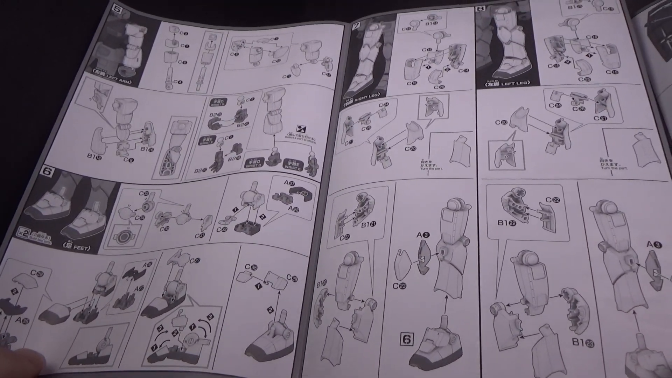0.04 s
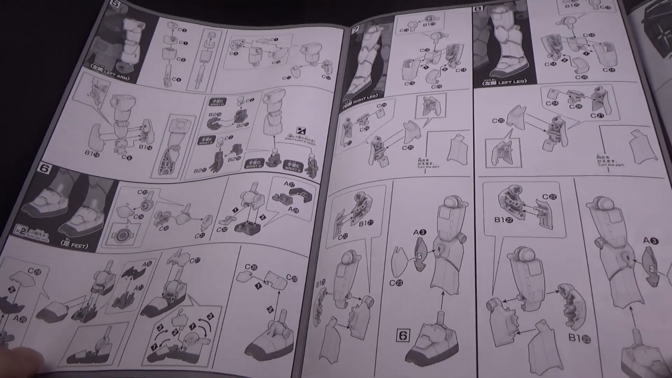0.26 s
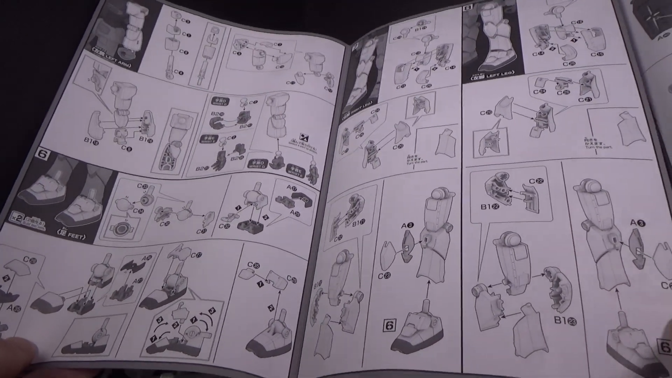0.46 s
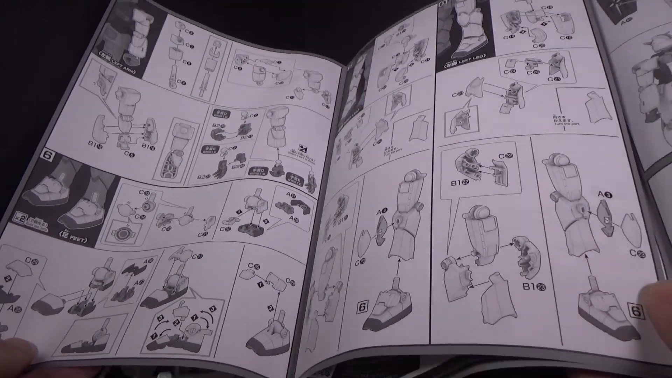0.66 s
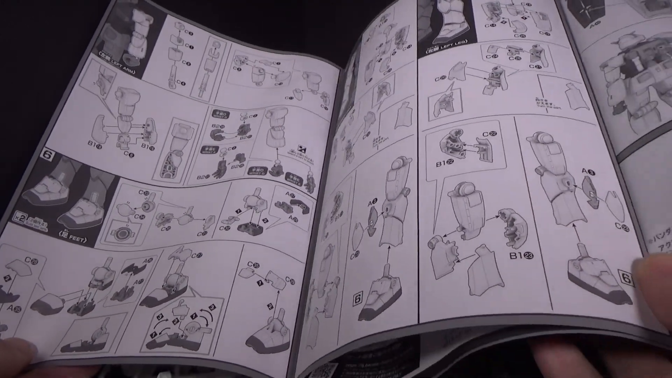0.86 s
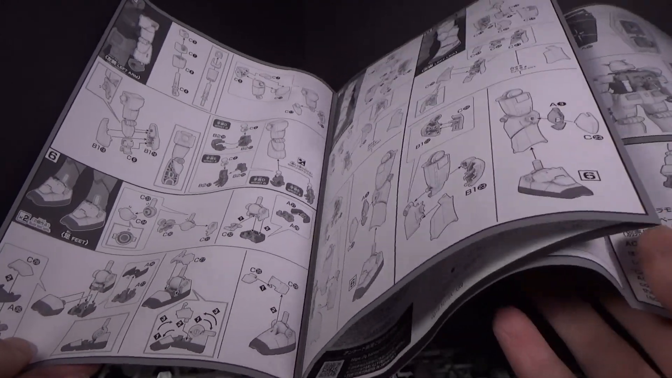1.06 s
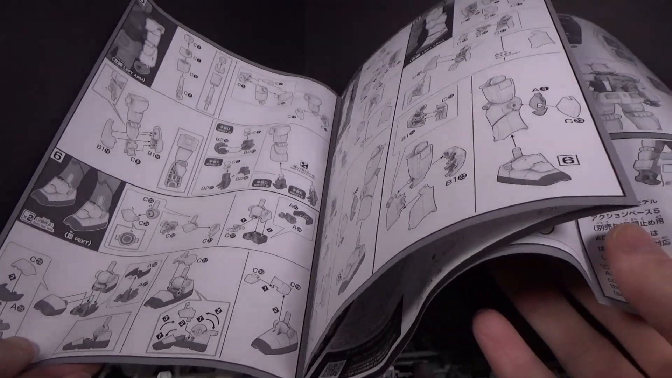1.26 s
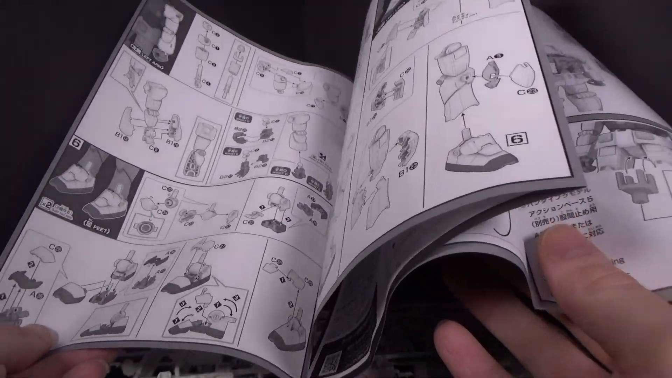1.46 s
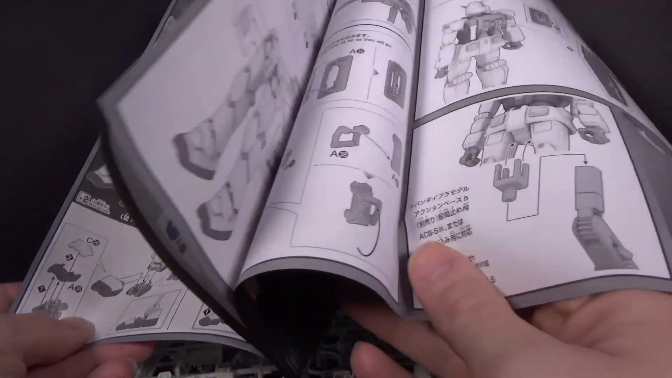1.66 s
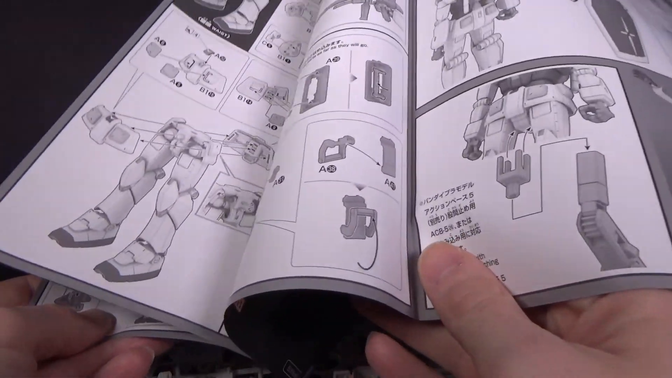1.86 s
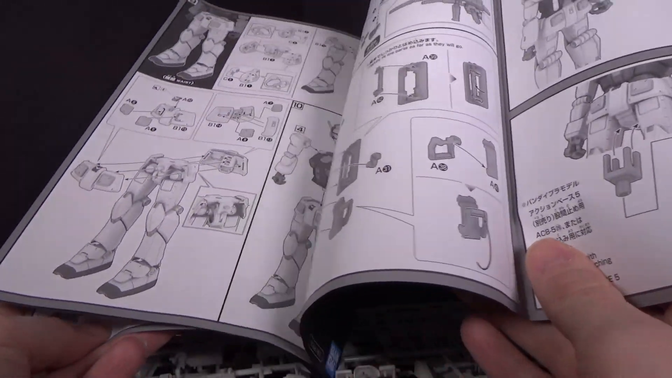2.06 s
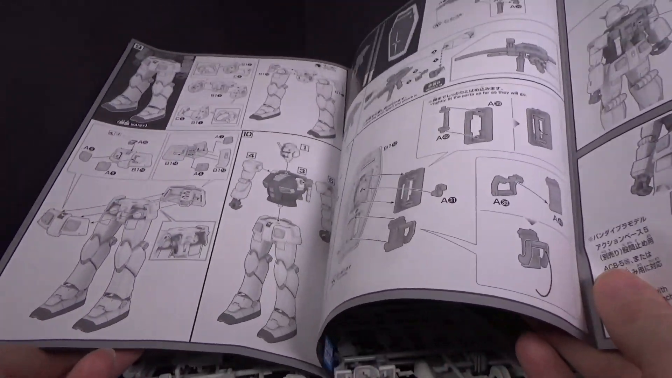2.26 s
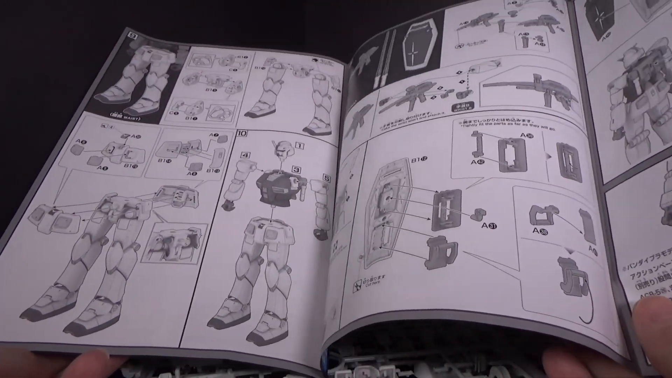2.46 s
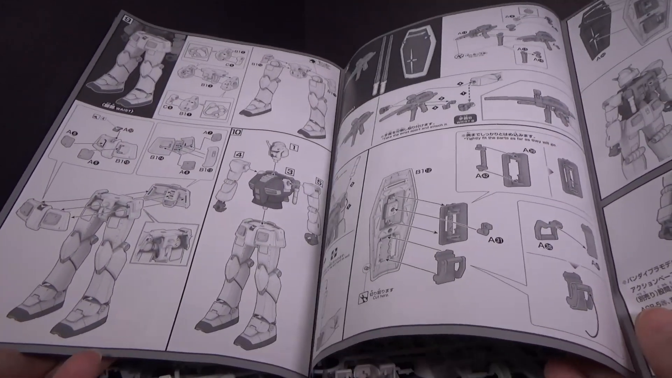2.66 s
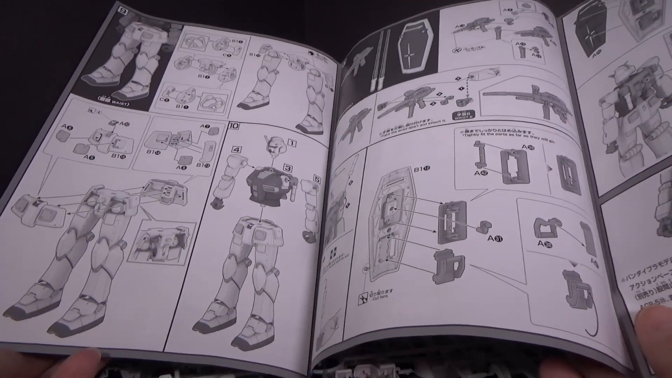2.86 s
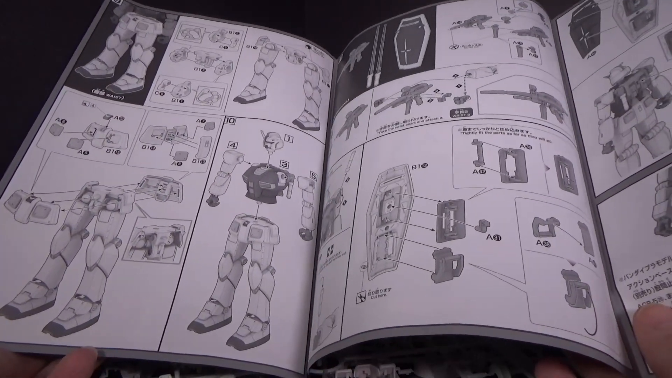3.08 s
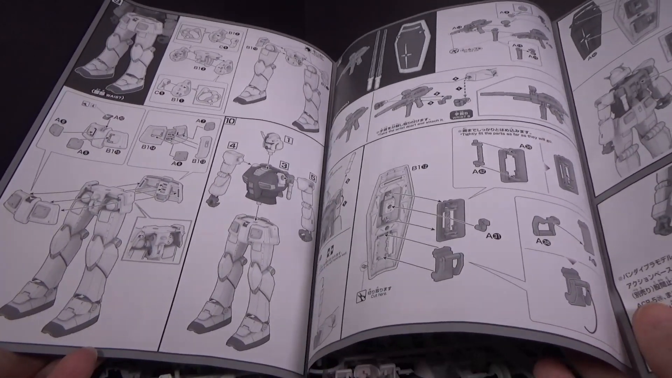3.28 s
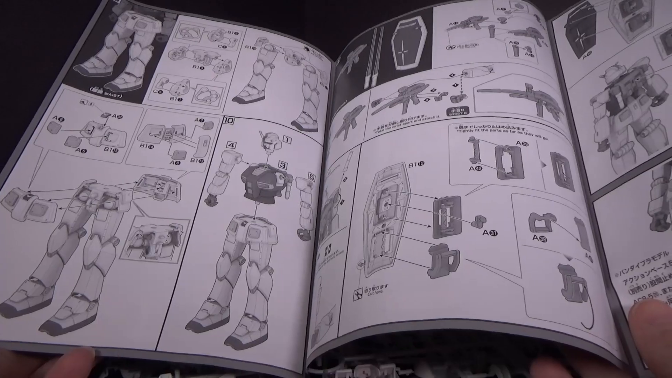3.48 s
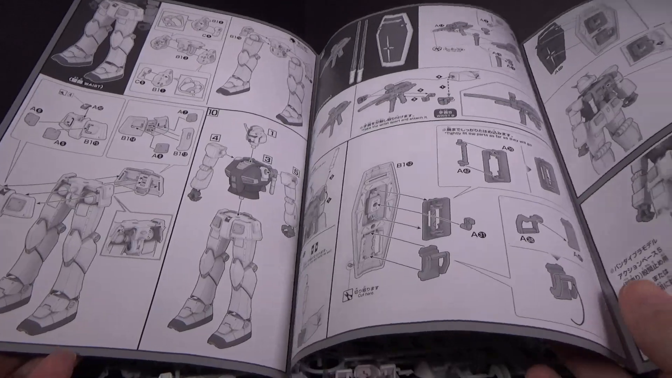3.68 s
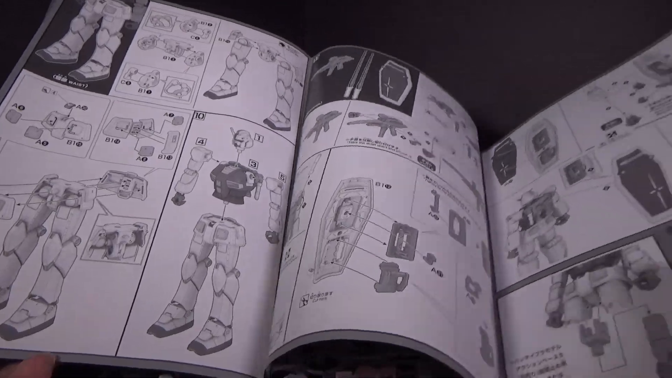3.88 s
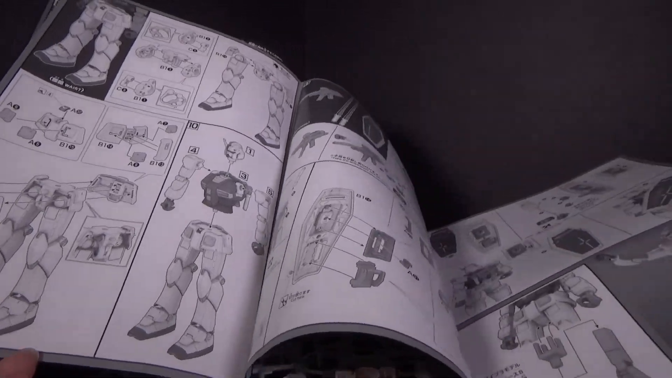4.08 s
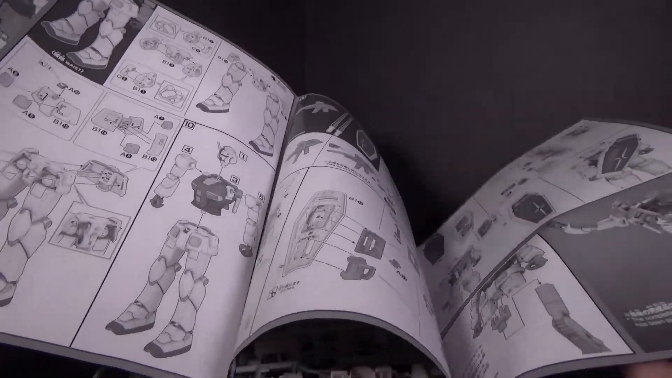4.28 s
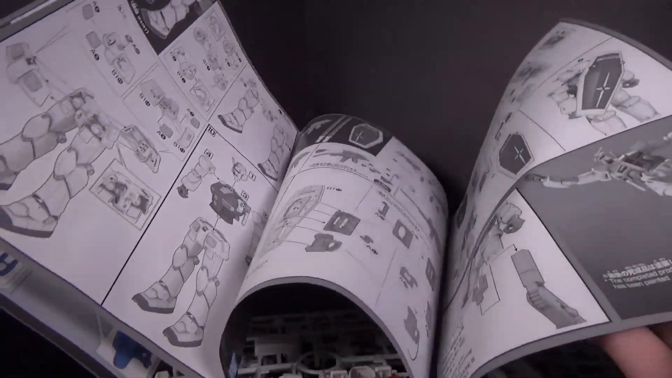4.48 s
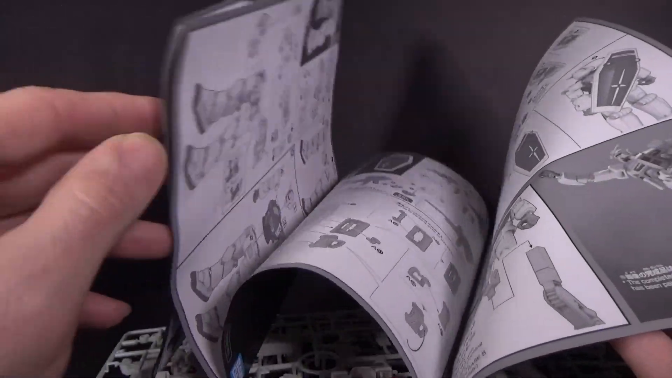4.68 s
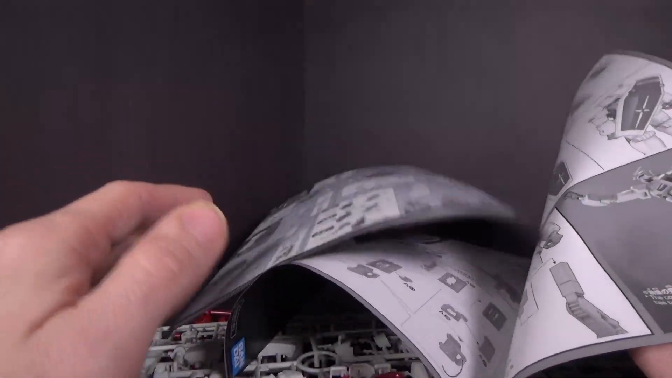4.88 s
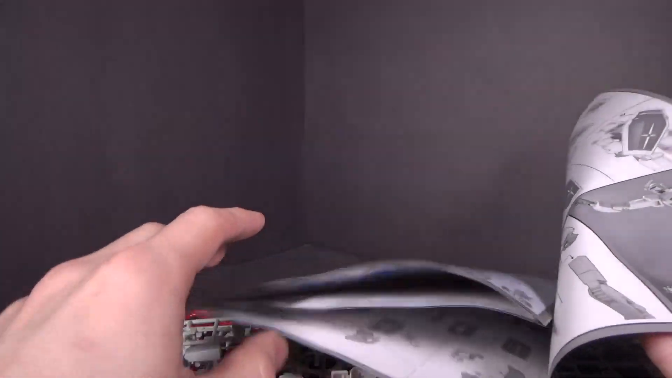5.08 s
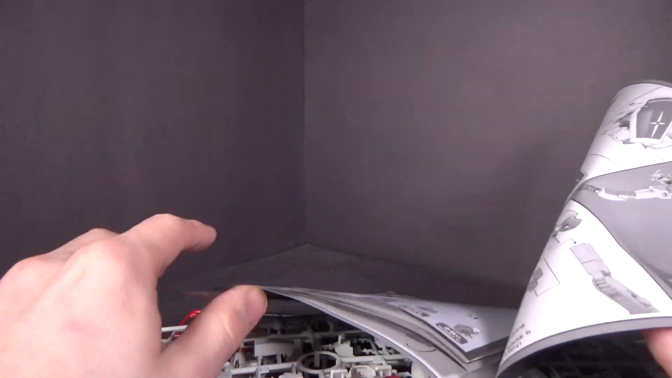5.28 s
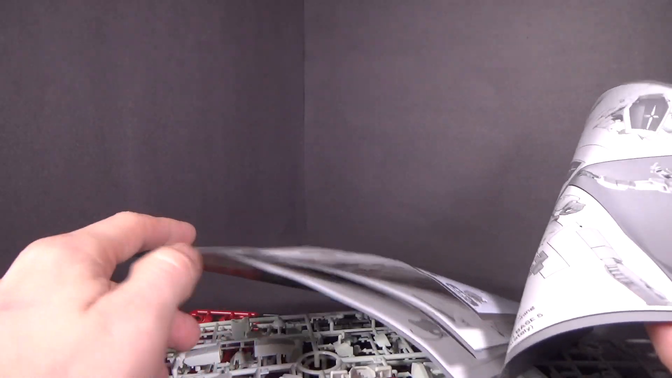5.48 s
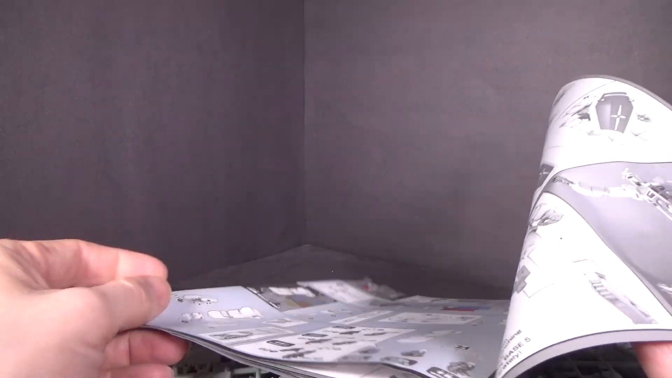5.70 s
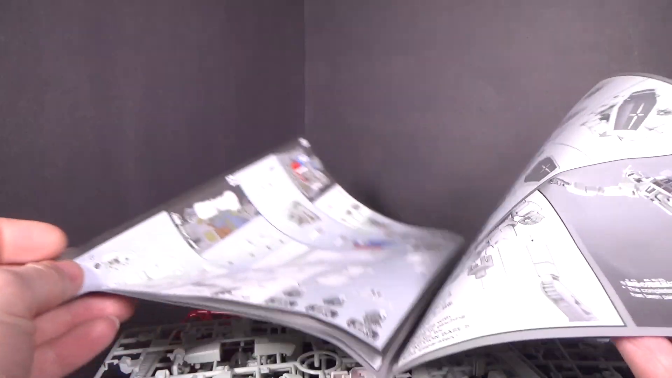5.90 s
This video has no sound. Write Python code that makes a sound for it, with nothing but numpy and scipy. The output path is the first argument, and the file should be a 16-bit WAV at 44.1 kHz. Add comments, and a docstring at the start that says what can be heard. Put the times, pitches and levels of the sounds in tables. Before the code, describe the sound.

Close, dry handling of a stiff glossy booklet in a small quiet room with faint steady background noise. From 0 to 1.4 s there are small scattered creases, short papery ticks, between very soft slides. At 1.5 s a bright loud snap starts a page turn, followed by lesser crackles and a hissing slide near 1.65 s; another hard snap comes at 2.1 s, with rustle and smaller creases until 2.5 s. Then only faint sliding remains until about 3.6 s, when a crisp crease opens a denser passage. Strong snaps at 3.9, 4.1 and 4.4 s mix with rustling strokes and low airy bumps, loudest around 4.0 s. Flaps and crackles cluster at 5.0-5.2 s, a sharp snap lands at 5.5 s, then lighter rustle eases out. Snaps are millisecond bursts, mid-pitched and woody-papery with sizzling tops, mostly doubled about 14 ms later by a close reflection, with a brief dull decay.

```python
"""Pages of a stiff glossy booklet are lifted, bent and turned close to a microphone in a small quiet room.
At first scattered creases snap between soft slides, with two loud snaps near 1.5 and 2.1 s.
From about 2.5 s only faint slides are left; at 3.6 s stronger, denser snaps and strokes set in, easing at the end.
Creases are short ticking bursts through resonances, slides are grainy noise, and moving air adds low bumps.
Most snaps and all page and room noise are heard twice, usually about 14 ms apart."""
import sys
import numpy as np
from scipy import signal
from scipy.fft import rfft, irfft, next_fast_len
from scipy.io import wavfile
from scipy.ndimage import uniform_filter1d

SR = 44100
rng = np.random.default_rng(int(sys.argv[2]) if len(sys.argv) > 2 else 0)


def unload_audio(sound):
    """Save the sound as a 16-bit wav file, at the path given as the first command line argument."""
    columns = np.transpose(np.atleast_2d(sound))
    # keep every value between -1 and 1, then stretch to whole-number steps
    steps = np.round(np.clip(columns, -1, 1) * 32767)
    wavfile.write(sys.argv[1], SR, steps.astype(np.int16))


N = 262086

CUTOFF_HZ = 16000
REPEAT_MS, REPEAT_DB = (13.4, 14.3), -1.5   # range of lags for the page and room noise; gain of every repeat


def snaps():
    """A crease gives way in a few ms of uneven ticks; the sheet rings at its pitch, the air behind it thumps."""
    # buckling creases: [t/s, crack level before the length scaling/dB, sheet pitch/Hz,
    # sizzle over crack/dB, repeat lag/ms (3 or less: none; held to 16)]
    creases = [(0.0471, -50.5, 1190, -12, 16.5), (0.1967, -47, 3500, -10, 16),
               (0.388, -37.5, 2770, -0.5, 16), (0.5443, -52, 1500, -12, 14.5), (0.6002, -38, 1500, -16, 15),
               (0.8332, -50, 1700, -11, 12.5), (0.9594, -45, 1100, 1, 14.5),
               (1.0296, -38, 2120, -0.5, 16.5), (1.363, -50.5, 1840, -11, 0), (1.4197, -52.5, 1010, -8, 12),
               (1.5107, -25, 3180, 1.5, 14.5), (1.544, -39, 1530, -4, 16), (1.574, -35.5, 1930, -19, 14.5),
               (1.6287, -31, 1840, 4, 14), (1.7469, -35.5, 1250, -10, 8.5), (1.8626, -54, 1130, -10, 13.5),
               (1.9185, -61, 2500, 19, -4), (1.959, -42.5, 1840, -11, 8.5), (2.0456, -35, 2170, -0.5, 14.5),
               (2.0871, -23.5, 1490, -3.5, 14.5), (2.1657, -41.5, 1030, -17, 14.5),
               (2.2204, -30.5, 1270, -4, 16), (2.312, -44.5, 1300, -1.5, 2.5), (2.4542, -33, 2030, -11, 0),
               (2.4798, -33.5, 1350, -12, 14), (2.4875, -35.5, 1044, -20, 13.5),
               (3.6, -29.5, 1300, -15, 14.5), (3.773, -36.5, 1670, -33, 14), (3.813, -32, 980, -36, 15.5),
               (3.916, -25, 1550, -9.5, 15.5), (4.0052, -37, 1230, -26, 7), (4.0918, -24.5, 1125, -15, 15),
               (4.2114, -30, 1850, -5.5, 16), (4.3102, -33, 3000, -3, 16.5),
               (4.3827, -25.5, 2220, -13, 13.5), (4.42, -39, 990, 1.5, 14), (4.4542, -37.5, 1500, -11, 9),
               (4.539, -38.5, 1540, -7, 14), (4.641, -32, 2260, -5.5, 0), (4.6544, -26.5, 1830, -7, 17.5),
               (4.7775, -48, 1700, -16, 12), (4.8562, -30.5, 1810, -49, 14.5),
               (4.9573, -37.5, 1440, -6, 14), (5.031, -34.5, 2470, -1, 12), (5.0364, -22.5, 1920, -5, 14.5),
               (5.077, -34.5, 1700, -3.5, 12.5), (5.126, -30.5, 1580, -20, 16),
               (5.149, -26, 1760, -23, 16.5), (5.5048, -21.5, 1870, -4, 15.5),
               (5.598, -38.5, 1650, -18, 16.5), (5.759, -33, 1960, -13, 12.5)]
    # bright top of a snap, relative density: [f/Hz, level/dB per Hz]
    sizzle_spectrum = [(3000, -31), (5000, 9.5), (8000, 5), (11000, -2), (13500, -12.5), (16000, -9)]
    creak_ms = 4   # the fold creaks this long before it gives way
    base_ms, longer_ms_per_db = 5.6, .08   # fading time at -30 dB; louder creases tear longer
    peaks_db, peak_spacing_hz = 2.5, 260   # each crease has an uneven spectrum of its own
    thump_even_hz, thump_db_per_octave, thump_least_db = 1110, -17, -37   # slack, low-pitched sheets thump most

    size, out = 3072, np.zeros(N + 5000)
    ms = np.arange(size) / SR * 1000
    ticks = grains((len(creases), size), 2.2)
    lumps = rng.standard_normal((len(creases), size // 32))
    peaks_hz = np.arange(200, CUTOFF_HZ, peak_spacing_hz)
    colours = peaks_db * rng.standard_normal((len(creases), len(peaks_hz)))
    for (s, crack_db, hz, sizzle_db, repeat_ms), tick, lump, colour in zip(creases, ticks, lumps, colours):
        length_ms = np.clip(base_ms + longer_ms_per_db * (crack_db + 30), 2, 8)
        length_ms = length_ms * np.clip(hz / 1500, .65, 1)   # slack sheets knock short
        creak = .45 * (ms / creak_ms) ** 2
        fading = np.exp(-(np.abs(ms - creak_ms - 1) / length_ms) ** 1.4 * 1.3)
        burst = tick * np.where(ms < creak_ms, creak, fading) * from_db(2.5 * np.repeat(lump, 32))
        # the break itself is one sharp click
        burst[round(creak_ms * SR / 1000)] += 6 * np.sqrt(np.mean(tick ** 2))
        burst = shaped(burst, np.transpose([peaks_hz, colour]))

        crack = resonance(burst, hz, .5 * hz) + .5 * band(burst, 600, 4500)
        ring = resonance(burst, hz, .22 * hz)   # the sheet rings on briefly
        crack = band(crack, 243, 7840) + .89 * ring
        sizzle = shaped(burst, sizzle_spectrum)
        thump = band(band(burst, 250, 800), 150, 900)
        thump_db = max(thump_db_per_octave * np.log2(hz / thump_even_hz), thump_least_db)
        parts = rms_one(crack) + from_db(thump_db) * rms_one(thump) + from_db(sizzle_db) * sizzle
        snap = from_db(crack_db) * parts * np.sqrt(length_ms / ms[-1])

        at = round((s - creak_ms / 1000) * SR)   # the break falls on the listed time
        out[at:at + size] += snap
        if repeat_ms > 3:
            at += round(min(repeat_ms, 16) * SR / 1000)
            out[at:at + size] += from_db(REPEAT_DB) * snap
    return out[:N]


def tail(x):
    """Close soft walls give a short dull decay: the sound is convolved with fading band-passed noise."""
    t60_s, level_db = .13, -15
    s = np.arange(SR // 4) / SR
    noise = band(rng.standard_normal(len(s)), 575, 2480)
    decay = noise * from_db(-60 * s / t60_s) * (s > .004)   # starts after 4 ms
    return from_db(level_db) * signal.fftconvolve(x, decay / np.sqrt(np.sum(decay ** 2)))[:N]


def handling():
    """Bent pages crackle in clumps, sliding ones hiss; one clumping drives both, over low flexing noise."""
    # hands always at the pages, levels before flicker: [t/s, air and flex/dB, faint rustle/dB, faint hiss/dB]
    touch_levels = [(0.0, -74, -71.5, -81.5), (0.9, -58, -60.5, -61.5), (1.25, -71.5, -71, -74),
                    (2.18, -56.5, -55, -67.5), (2.9, -68, -68, -87.5), (3.45, -70.5, -79.5, -74.5),
                    (3.97, -49.5, -45, -63), (5.5, -60.5, -55.5, -63.5), (5.7, -60, -58, -63),
                    (5.94, -57, -56, -58)]
    # hiss of sliding sheets, relative density: [f/Hz, level/dB per Hz]
    slide_spectrum = [(2000, -3.5), (3000, 13), (5000, 6), (8000, 6), (11000, 7), (14000, -3.5),
                      (16000, -5)]
    # low air and flex noise, relative density: [f/Hz, level/dB per Hz]
    flex_spectrum = [(40, -21), (70, -7.5), (120, 2.5), (220, 2.5), (350, -14.5), (500, -12)]
    ticks_per_s, tick_gain_db = 70, 24   # tiny separate creases within the grain

    flex_db, rustle_db, hiss_db = in_time(touch_levels)
    clumps = .7 * drift(35) + drift(160)
    ticks = from_db(tick_gain_db) * (rng.random(N) < ticks_per_s / SR) * rng.standard_normal(N)
    crackle = sheet(grains(N, 3.6) + ticks, broad_db=-4)
    rustle = patchy(from_db(1.6 * clumps) * crackle)
    sliding = shaped(grains(N, 3.0) + .5 * ticks, slide_spectrum)
    hiss = patchy(from_db(2.3 * clumps) * sliding)
    flex = from_db(flex_db + 3.5 * drift(8.7)) * coloured(flex_spectrum, patchy_db=7.5)
    # a one-second shift keeps the faint grain apart from that of the strokes
    faint = from_db(rustle_db) * np.roll(rustle, SR) + from_db(hiss_db) * np.roll(hiss, SR)
    faint = from_db(2.08 * drift(1.5)) * faint   # the touch comes and goes
    return swishes(rustle, hiss) + faint + flex


def swishes(rustle, hiss):
    """Each stroke of rustle and hiss starts quickly, trails off, and favours the pitch of the bent sheet."""
    # sheets sliding and flexing: [t/s, length before the trail/s, rustle gain/dB, hiss over rustle/dB]
    strokes = [(0.032, 0.038, -60, -22), (0.361, 0.17, -62, -1.5), (0.536, 0.055, -48.5, -28),
               (0.609, 0.057, -55, -11), (0.712, 0.12, -55, -1.5), (0.821, 0.061, -52, -0.5),
               (0.904, 0.054, -56.5, 3), (0.952, 0.17, -50.5, 1.5), (1.352, 0.058, -61.5, -31),
               (1.412, 0.044, -52, -29), (1.484, 0.19, -52.5, 1), (1.627, 0.093, -43.5, 3.5),
               (1.856, 0.039, -49, -38), (1.936, 0.14, -57, 0.5), (2.049, 0.15, -50, -3),
               (2.215, 0.049, -42.5, -8), (2.278, 0.21, -54.5, -6.5), (2.497, 0.017, -48, -16),
               (2.507, 0.16, -61.5, 1), (2.69, 0.068, -61, -10.5), (2.952, 0.079, -62, -1.5),
               (3.409, 0.096, -60.5, -13), (3.548, 0.053, -58.5, -3), (3.586, 0.15, -39, -17.5),
               (3.733, 0.076, -49, -0.5), (3.848, 0.058, -47, -42), (3.914, 0.044, -40, -16),
               (3.993, 0.048, -37.5, -12), (4.125, 0.075, -41, -6.5), (4.27, 0.074, -42, 4.5),
               (4.363, 0.082, -42, -19), (4.452, 0.059, -44.5, 0), (4.538, 0.12, -45, -9),
               (4.644, 0.064, -37, -5.5), (4.763, 0.069, -44.5, -28), (4.933, 0.14, -54, 5),
               (5.039, 0.093, -42.5, 0.5), (5.13, 0.11, -36, 0), (5.253, 0.11, -51.5, 0),
               (5.365, 0.21, -56.5, 6.5), (5.498, 0.066, -38.5, -20), (5.582, 0.067, -47, 1),
               (5.71, 0.072, -52.5, -2.5), (5.755, 0.036, -42.5, -8), (5.819, 0.057, -54.5, 3),
               (5.874, 0.053, -58.5, 16.5)]
    # pitch of the sheets as they bend and slacken: [t/s, f/Hz]
    bend_curve = [(0, 1094), (0.5, 1436), (0.75, 1545), (1.1, 1490), (1.37, 1030), (1.43, 1500),
                  (1.52, 1810), (1.66, 1500), (1.73, 1230), (1.86, 1110), (1.96, 1520), (2.25, 1013),
                  (2.65, 642), (2.96, 1000), (3.4, 707), (3.62, 1180), (3.75, 1124), (3.86, 740),
                  (3.96, 1430), (4.1, 700), (4.19, 712), (4.27, 2200), (4.45, 1840), (4.55, 1145),
                  (4.65, 1550), (5.1, 1542), (5.28, 1318), (5.94, 1518)]
    rise_share, fade_db, trail_share = .2, -8.5, .16   # shares of the length; fade along the length
    ring_db = -3   # narrow rings against the broad bent sound

    out, (bend_hz,) = np.zeros(N), in_time(bend_curve)
    ringing = rings(rustle, bend_hz)
    hiss_hz = rng.uniform(5000, 10000, len(strokes))   # each slide has its own brightest region
    for (s, length_s, rustle_db, hiss_db), bright_hz in zip(strokes, hiss_hz):
        at, size = round(s * SR), round(2 * length_s * SR)
        along = np.arange(min(size, N - at)) / SR / length_s
        stroke = np.minimum(along / rise_share, 1) * from_db(fade_db * (np.minimum(along, 1) - .5))
        stroke = stroke * np.exp(-np.maximum(along - 1, 0) / trail_share)

        grain, air = rustle[at:at + size], hiss[at:at + size]
        hz = bend_hz[at + size // 8]   # pitch a quarter of the way along
        bent = band(resonance(grain, hz, .85 * hz), .077 * hz, 4.15 * hz) + .15 * grain
        bent = rms_one(bent) + from_db(ring_db) * rms_one(ringing[at:at + size])
        airy = rms_one(air + resonance(air, bright_hz, .5 * bright_hz))
        out[at:at + size] += from_db(rustle_db) * stroke * (bent + from_db(hiss_db) * airy)
    return out


def rings(x, bend_hz):
    """Narrow rings of the curved sheet that slide with its bend, retuned every 256 samples."""
    width_hz, wander_octaves, size = 39, .1, 256
    r, out = np.exp(-np.pi * width_hz / SR), np.zeros(N)
    for ratio in (0.618, 1.0, 1.278, 1.899):   # to the pitch of the bent sheet
        hz, state = bend_hz * ratio * 2 ** (wander_octaves * drift(5.6)), [0., 0.]
        for i in range(0, N, size):
            poles = [1, -2 * r * np.cos(2 * np.pi * hz[i] / SR), r * r]
            piece, state = signal.lfilter([1, 0, -1], poles, x[i:i + size], zi=state)
            out[i:i + size] += piece
    return out


def sheet(x, broad_db):
    """The pages ring in a few resonances, two broad and one narrow, over a band of the plain grain."""
    # resonances of the pages: [f/Hz, width/Hz, relative level/dB]
    page_modes = [(565, 230, 17.5), (1330, 2080, 16.5), (1792, 15.5, 22.5)]
    modes = sum((-1) ** k * from_db(db) * resonance(x, hz, width)
                for k, (hz, width, db) in enumerate(page_modes))
    return rms_one(rms_one(modes) + from_db(broad_db) * rms_one(band(x, 185, 3320)))


def patchy(x):
    """Narrow regions of the spectrum swell and fade on their own as the paper changes shape; rms 1."""
    depth_db, width_hz, life_ms = 3.3, 170, 40   # rough size of a region
    size, hop = 512, 128
    _, _, cells = signal.stft(x, nperseg=size, noverlap=size - hop)
    field = rng.standard_normal(cells.shape)
    for axis, extent in enumerate([width_hz * size / SR, life_ms / hop * SR / 1000]):
        for _ in range(2):   # smoothed twice for soft edges
            field = uniform_filter1d(field, max(round(extent / 1.4), 1), axis=axis)
    cells = cells * from_db(depth_db * field / field.std())
    return rms_one(signal.istft(cells, nperseg=size, noverlap=size - hop)[1][:N])


def doubled(x):
    """Overlapping stretches of about 45 ms come back once, each after a lag of its own."""
    size, out = 2048, x.copy()
    for i in range(0, N - size - 1000, size // 2):
        lag = int(rng.uniform(*REPEAT_MS) * SR / 1000)
        out[i + lag:i + lag + size] += from_db(REPEAT_DB) * np.hanning(size) * x[i:i + size]
    return out / np.sqrt(1 + from_db(2 * REPEAT_DB))   # power of an unrelated repeat evened out


def bumps():
    """Low bumps of air and hands: sine cycles that swell and fade under a smooth window."""
    # [centre t/s, f/Hz, peak level/dB]
    low_bumps = [(0.485, 85, -51), (0.577, 130, -57), (0.85, 135, -54), (0.897, 107, -52.5),
                 (0.978, 213, -49), (1.088, 152, -53.5), (1.756, 25, -50), (1.854, 13, -44),
                 (2.226, 196, -42.5), (2.257, 99, -53.5), (2.325, 18.5, -49), (2.979, 60, -57),
                 (4.026, 125, -31.5), (4.018, 226, -34.5), (4.082, 66, -43.5), (4.5, 114, -44.5),
                 (4.575, 248, -38.5), (4.636, 91, -51), (5.082, 157, -47), (5.176, 203, -36),
                 (5.218, 132, -38), (5.272, 18, -42.5), (5.12, 46, -51), (5.814, 11.3, -38.5)]
    s_at_100_hz, shortening = .09, .34   # higher bumps are shorter, by this power of their pitch
    out = np.zeros(N)
    for (s, hz, peak_db), phase in zip(low_bumps, rng.uniform(0, 2 * np.pi, len(low_bumps))):
        t = np.arange(round(s_at_100_hz * (100 / hz) ** shortening * SR)) / SR
        at = round(s * SR) - len(t) // 2
        out[at:at + len(t)] += from_db(peak_db) * np.hanning(len(t)) * np.sin(2 * np.pi * hz * t + phase)
    return out


def sway():
    """Slow air pressure on the microphone: very low noise whose level drifts."""
    return from_db(-64 + 1.3 * drift(.53)) * rms_one(band(rng.standard_normal(N), 8.1, 18.0))


def quiet_room():
    """Steady faint noise of the room, each band flickering a little."""
    # relative density: [f/Hz, level/dB per Hz]
    room_spectrum = [(20, -24), (60, -8), (120, -10), (250, -17), (600, -23.5), (1500, -13.5), (2200, -23),
                     (5000, -26.5), (10000, -33.5), (16000, -31)]
    return from_db(-71) * coloured(room_spectrum, patchy_db=3.5)


def from_db(db):
    """Gain of a level in dB."""
    return 10 ** (np.asarray(db) / 20)


def rms_one(x):
    """Scaled to rms 1."""
    return x / np.sqrt(np.mean(x ** 2, axis=-1, keepdims=True) + 1e-20)


def in_time(rows):
    """Each column of a curve table, sample by sample."""
    s, *columns = np.transpose(rows)
    return [np.interp(np.arange(N) / SR, s, c) for c in columns]


def drift(rate):
    """Slow random wander of spread 1: noise through two equal low-pass poles at the rate in Hz."""
    step = 20   # computed on every 20th sample
    r = np.exp(-2 * np.pi * rate * step / SR)
    noise = rng.standard_normal(N // step + 2002)
    slow = signal.lfilter([1], [1, -2 * r, r * r], noise)[2000:]   # the filter has settled
    return np.interp(np.arange(N) / step, np.arange(len(slow)), rms_one(slow))


def grains(shape, spread_db):
    """Dense noise whose samples now and then stand far out: tiny slips and ticks."""
    return rng.standard_normal(shape) * from_db(spread_db * np.minimum(rng.exponential(1, shape), 5))


def band(x, low_hz, high_hz):
    """Band-pass."""
    edges = [low_hz, min(high_hz, .45 * SR)]
    return signal.sosfilt(signal.butter(2, edges, "band", fs=SR, output="sos"), x)


def resonance(x, hz, width_hz):
    """One resonance, gain about 1 on top."""
    r = np.exp(-np.pi * width_hz / SR)
    poles = [1, -2 * r * np.cos(2 * np.pi * hz / SR), r * r]
    return signal.lfilter([(1 - r * r) / 2, 0, (r * r - 1) / 2], poles, x)


def shaped(x, spectrum):
    """The sound filtered by the given spectrum, with almost nothing below its first frequency; rms 1."""
    hz, level_db = np.transpose(spectrum)
    size = next_fast_len(len(x) + 512)
    grid = np.maximum(np.arange(size // 2 + 1) * SR / size, 1)
    gain = from_db(np.interp(np.log(grid), np.log(hz), level_db, left=-60))
    return rms_one(irfft(rfft(x, size) * gain, size)[:len(x)])


def coloured(spectrum, patchy_db):
    """Half-octave bands of noise, each with its level from the spectrum and its own flicker; rms 1."""
    hz, level_db = np.transpose(spectrum)
    centres = hz[0] * 2 ** np.arange(0, np.log2(hz[-1] / hz[0]) + .25, .5)
    gains_db = np.interp(np.log(centres), np.log(hz), level_db)
    white = rng.standard_normal((2, N))   # neighbouring bands take turns, so they are unrelated
    out = np.zeros(N)
    for k, (centre, gain_db) in enumerate(zip(centres, gains_db)):
        noise = band(white[k % 2], centre / 2 ** .25, centre * 2 ** .25)
        out += from_db(gain_db + patchy_db * drift(14)) * noise
    return rms_one(out)


def scene():
    """Snaps with their decay, doubled handling and room noise, low bumps and slow air."""
    cracks = snaps()
    pages_and_room = doubled(handling() + quiet_room())
    return (cracks + tail(cracks) + pages_and_room + bumps() + sway())[None]


def record(dry):
    """The top is cut steeply."""
    return signal.sosfilt(signal.cheby2(14, 70, CUTOFF_HZ * 1.03, fs=SR, output="sos"), dry)


dry = scene()
out = record(dry)
unload_audio(out)
```